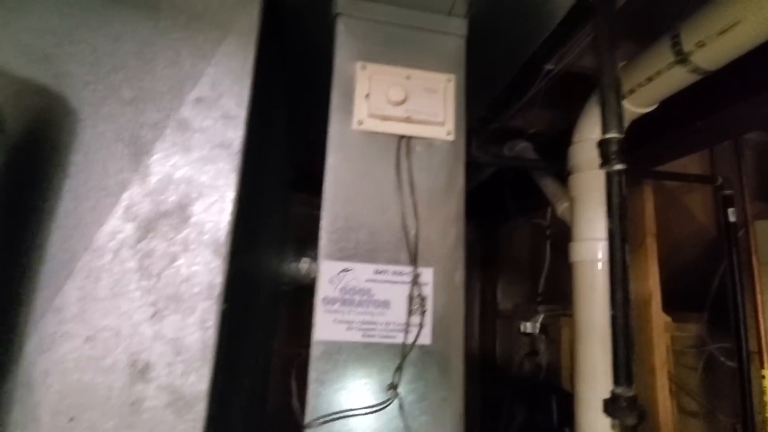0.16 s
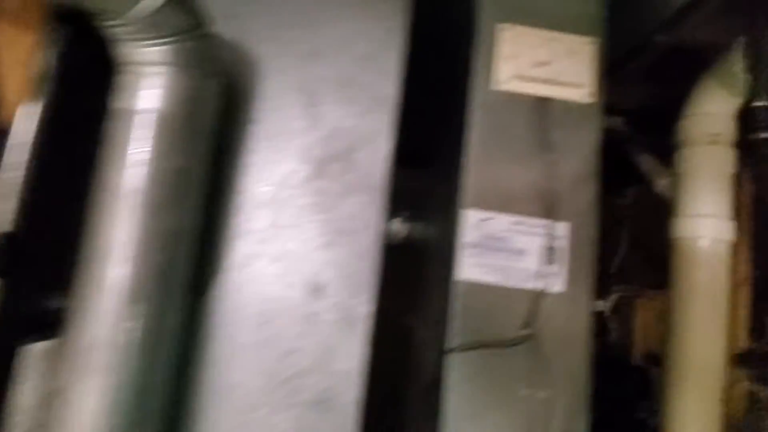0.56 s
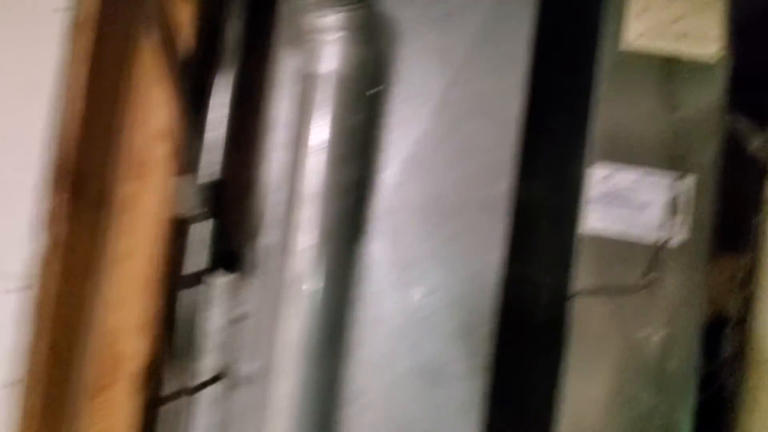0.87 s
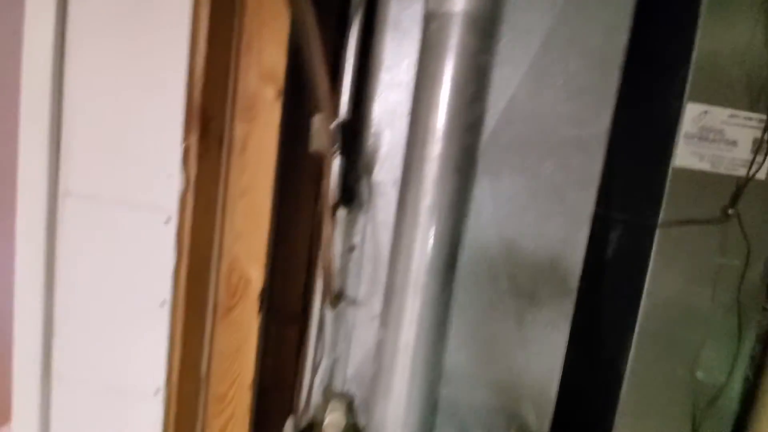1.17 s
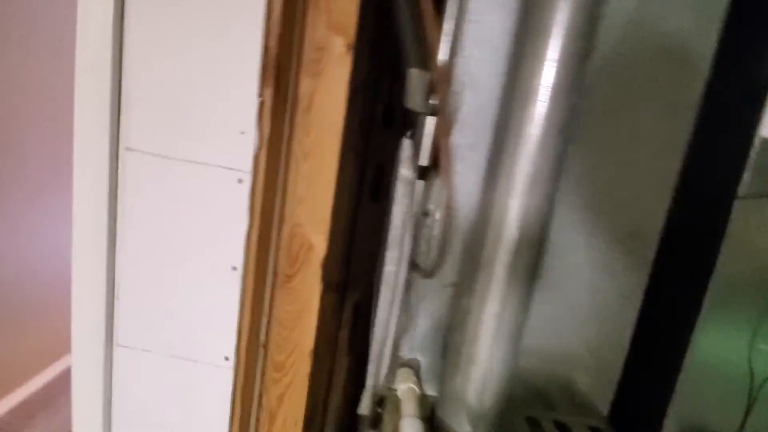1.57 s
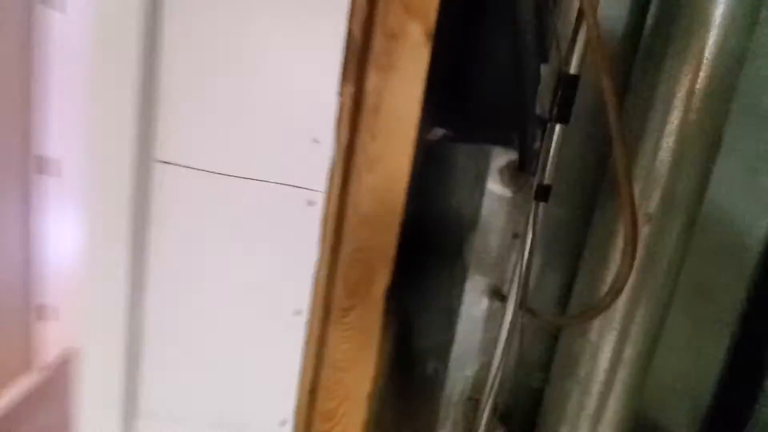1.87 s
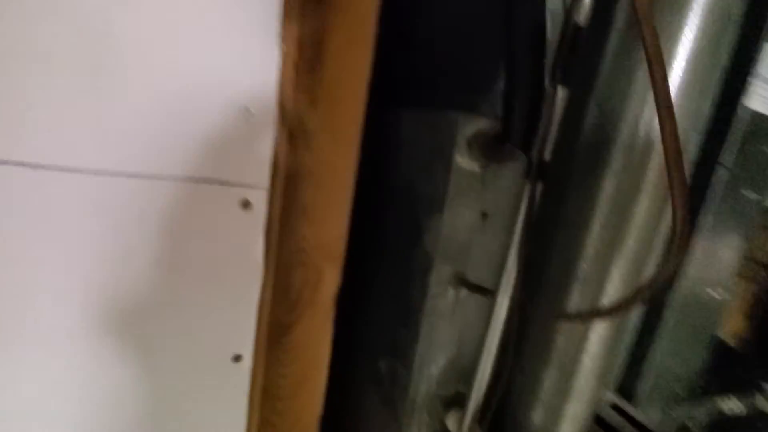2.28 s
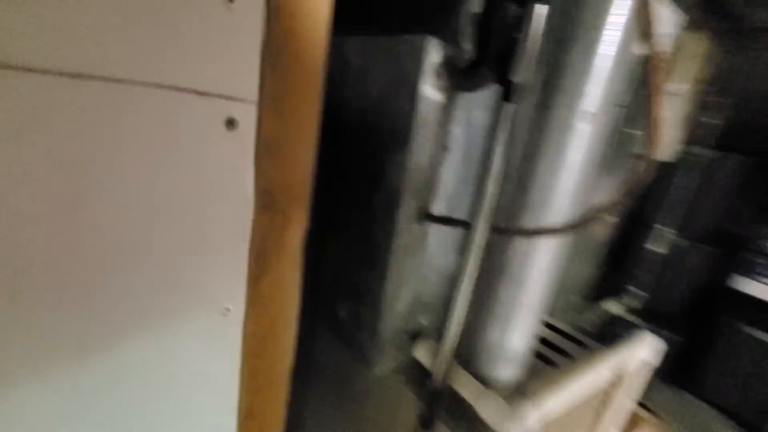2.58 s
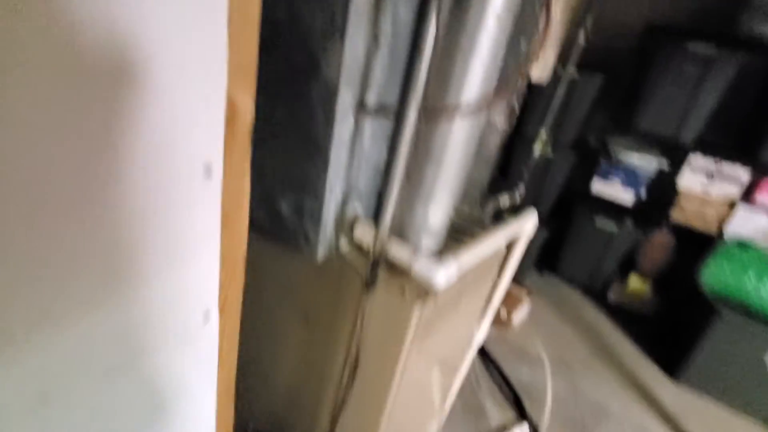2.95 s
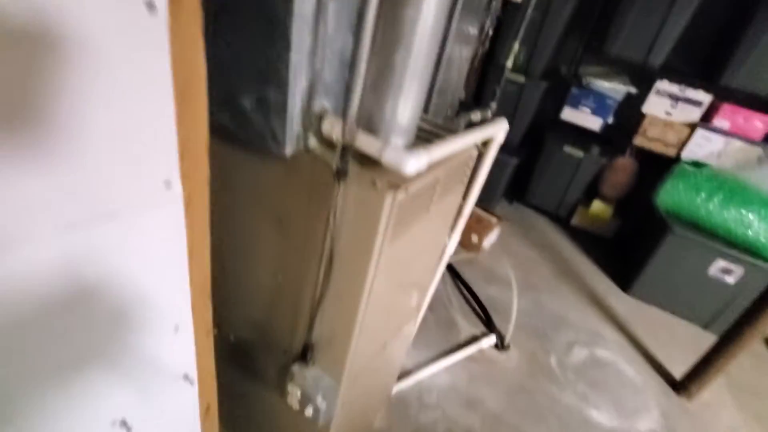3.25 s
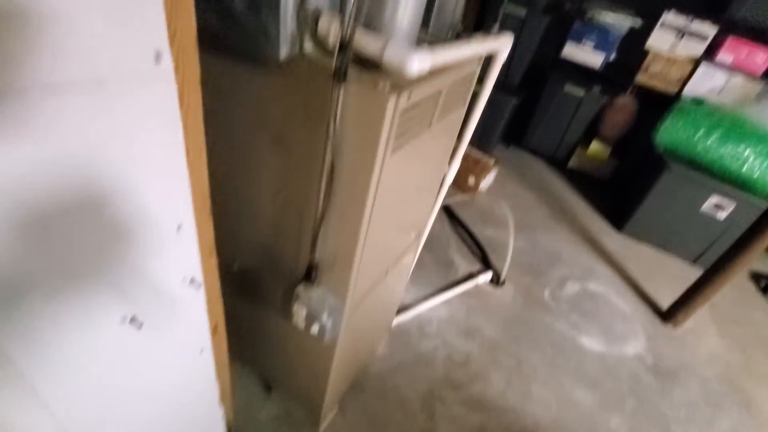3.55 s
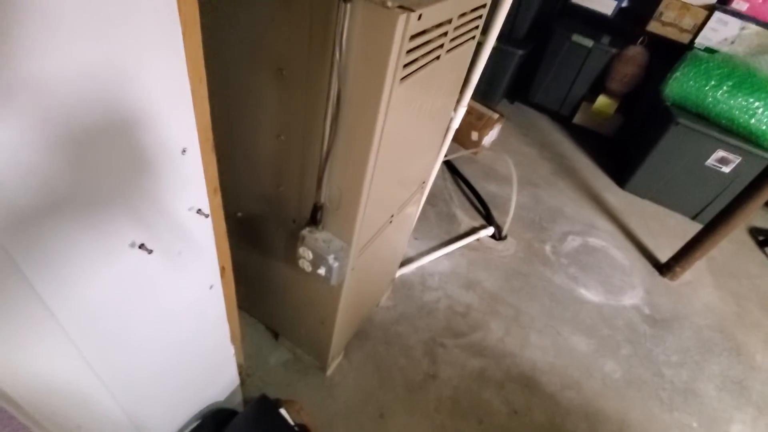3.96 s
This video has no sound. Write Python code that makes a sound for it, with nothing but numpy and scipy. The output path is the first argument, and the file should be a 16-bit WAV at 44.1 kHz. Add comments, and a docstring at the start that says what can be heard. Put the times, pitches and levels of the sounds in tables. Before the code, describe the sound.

In a basement, a running furnace gives a steady low motor hum and a broad rumble of air through sheet-metal ducts. The handheld stereo microphone moves along close by, so hollow metallic resonances shift and the sound slowly grows duller and quieter. Soft cloth brushes come early; just before two seconds there is a light tap and scuff, then a sharper click with a wooden knock around 2.7 seconds, and small clicks afterwards.

```python
"""Basement furnace with duct airflow

A motor hums at twice the mains rate, with weaker wavering tones, as steady sines with slow level changes.
Filtered noise is the rumbling, rushing air; it excites resonances of the sheet-metal ducts and cabinet.
The microphone passes the ducts and backs away: resonances come and go, the echoes shift and mostly lengthen.
Enveloped noise makes soft brushes of sleeves and soles and light clicks; decaying sines make wooden knocks.
"""
import sys
import numpy as np
from scipy.fft import rfft, irfft, next_fast_len
from scipy.io import wavfile

SR = 44100
rng = np.random.default_rng(int(sys.argv[2]) if len(sys.argv) > 2 else 0)


def generate_wav(signal):
    """Clip the signal to [-1, 1] and save it as 16-bit WAV at the path in sys.argv[1]."""
    frames = np.transpose(np.atleast_2d(signal))
    scaled = np.clip(frames, -1, 1) * 32767
    pcm = np.round(scaled).astype(np.int16)
    wavfile.write(sys.argv[1], SR, pcm)


N = 181780
TIME = np.arange(N) / SR   # s
SIZE = next_fast_len(N, True)
BINS = np.maximum(np.arange(SIZE // 2 + 1) * SR / SIZE, 1)   # Hz


def from_db(db):
    """Decibels to gain."""
    return 10 ** (np.asarray(db) / 20)


def rms_one(x):
    """Scale to unit rms."""
    return x / np.sqrt(np.mean(x ** 2) + 1e-20)


def in_time(rows):
    """One curve per value column, joined by straight lines."""
    s, *columns = np.transpose(rows)
    return [np.interp(TIME, s, column) for column in columns]


def over_bins(points):
    """Table read along the log-frequency axis."""
    hz, value = np.transpose(points)
    return np.interp(np.log(BINS), np.log(hz), value)


def wave(spectrum):
    """Spectrum back to sound."""
    return irfft(spectrum, SIZE)[..., :N]


def drift(rate_hz):
    """Low-passed noise of unit rms: slow random variation."""
    noise = rfft(rng.standard_normal(SIZE))
    return rms_one(wave(noise / (1 + (BINS / rate_hz) ** 2)))


def registers(spectrum, centres_hz):
    """Split a sound into overlapping registers that add up to the whole."""
    parts = []
    for shares in np.eye(len(centres_hz)):
        weight = over_bins(list(zip(centres_hz, shares)))
        parts.append(wave(spectrum * weight))
    return parts


def room_noise():
    """Spectrum of stereo white noise at 0 dB per Hz; long waves reach both ports alike."""
    # left-right likeness: (frequency [Hz], correlation)
    likeness = [(60, 0.96), (180, 0.98), (350, 0.92), (750, 0.7), (1200, 0.26), (2000, 0), (16000, 0)]
    alike = np.clip(over_bins(likeness), -1, 1)
    mid, side = rfft(rng.standard_normal((2, SIZE))) * np.sqrt(SR) / 2
    return np.sqrt(1 + alike) * mid + np.sqrt(1 - alike) * side * [[1], [-1]]


def standing_waves(ripple_db=2.5, spacing_hz=30, dense_above_hz=700):
    """The basement's many overlapping modes leave fine peaks and dips across the spectrum."""
    count = SR // 20
    ripple = np.interp(BINS / spacing_hz, np.arange(count), rng.standard_normal(count))
    density = BINS / (BINS + dense_above_hz)
    return from_db(ripple_db * ripple * density)


def contact_noise(colour, envelopes, tilts_db, pans_db, low_cut_hz=300, tilt_pivot_hz=4970):
    """Stereo noise under one envelope per contact, each with its own brightness and side."""
    # centres of the registers that carry the tilt: (frequency [Hz])
    centres_hz = [1100, 3200, 8000, 14000]
    low_cut = BINS / (BINS + low_cut_hz)
    parts = registers(room_noise() * from_db(over_bins(colour)) * low_cut, centres_hz)
    powers, out = np.square(envelopes), 0
    for hz, part in zip(centres_hz, parts):
        octaves = np.log2(hz / tilt_pivot_hz)
        gains = from_db(tilts_db * octaves + [pans_db, -pans_db])
        out = out + part * np.sqrt(gains ** 2 @ powers)   # contacts add in power
    return out / np.std(sum(parts))


def motor(hum_hz=119.8, hum_waver_db=3.0, phase_wander_rad=0.66):
    """The mains-locked hum holds its pitch; motor and fan tones waver in level and phase."""
    # hum before waver: (time [s], level [dB rms])
    hum_levels = [(0, -31), (.5, -31.5), (1, -28.5), (1.4, -36), (1.8, -30), (2.3, -35), (3.1, -41),
                  (3.8, -35.5), (4.12, -42)]
    # weaker tones: (frequency [Hz], level before waver [dB rms], waver [dB rms])
    tones = [(95.65, -42.5, 4.5), (254.7, -52, 9.5), (345.3, -62, 6.5), (494, -59, 7), (671, -60, 5.5),
             (710, -56.5, 1), (900, -66, 8)]
    hum_db, = in_time(hum_levels)
    hum = np.sin(2 * np.pi * (hum_hz * TIME + rng.random()))
    out = from_db(hum_db + hum_waver_db * drift(2.5)) * hum
    for hz, level_db, waver_db in tones:
        phase = 2 * np.pi * (hz * TIME + rng.random()) + phase_wander_rad * drift(0.6)
        out = out + from_db(level_db + waver_db * drift(0.72)) * np.sin(phase)
    return np.sqrt(2) * out   # sine peak from rms


def airflow(rumble_hz=148, rush_hz=1280, hiss_hz=9000):
    """Broad turbulence; rumble, rush and hiss each fade at their own rate with distance."""
    # turbulence before ripple and fade: (frequency [Hz], density [dB per Hz])
    air_colour = [(20, -81), (31, -93), (48, -55.5), (75, -52), (180, -59), (270, -60.5), (350, -69.5),
                  (620, -69.5), (820, -69), (1000, -73.5), (1600, -78.5), (2200, -80), (3200, -84),
                  (4000, -86.5), (5200, -92), (8000, -99.5), (16000, -101.3)]
    # loss as the microphone backs away: (rumble [dB/s], rush [dB/s], hiss [dB/s])
    fade_db_per_s = (0.8, 1.3, .5)
    turbulence = room_noise() * from_db(over_bins(air_colour)) * standing_waves()
    parts = registers(turbulence, (rumble_hz, rush_hz, hiss_hz))
    from_middle_s = TIME - TIME.mean()
    return sum(from_db(-loss * from_middle_s) * part for loss, part in zip(fade_db_per_s, parts))


def ducts(far_db=-19, eddy_count=4, reach_s=0.83, reach_at_hz=514):
    """Turbulence rings each resonance, which swells as the microphone passes; low ones swell more slowly."""
    # duct and cabinet modes: (frequency [Hz], width [Hz], level at loudest [dB rms], loudest at [s])
    duct_modes = [(93, 14.3, -42, 1.4), (154.8, 21, -36, 0.11), (211.5, 30, -41, 3.1),
                  (245, 28.8, -41, 2.2), (344.6, 22.2, -44, 1.86), (393, 45, -40, 1.37),
                  (422.3, 23, -47.5, 4.24), (479, 34, -50.5, 1.93), (534, 96, -44.5, .1),
                  (591, 64, -46, 3.8), (656, 48, -48.5, 1.24), (767, 59, -44.5, 1),
                  (878.4, 33, -45.5, 0.57), (1101, 98, -43, 0.11), (1187, 170, -50, 1.06),
                  (1520, 100, -58.5, 1.75), (2760, 290, -51, .14)]
    eddies = [room_noise() for _ in range(eddy_count)]   # neighbouring modes get unrelated noise
    out = 0
    for k, (hz, width_hz, level_db, loudest_s) in enumerate(duct_modes):
        detune = (BINS ** 2 - hz ** 2) / (BINS * width_hz)
        resonance = 1 / (1 + 1j * np.sqrt(2) * detune - detune ** 2)
        ringing = rms_one(wave(eddies[k % eddy_count] * resonance))
        passing_s = reach_s * reach_at_hz / hz   # grows with wavelength
        near = np.exp(-0.5 * ((TIME - loudest_s) / passing_s) ** 2)
        out = out + from_db(level_db) * np.maximum(near, from_db(far_db)) * ringing
    return out


def with_echoes(air):
    """Two dull echoes comb the noise; its peaks and dips slide as the lags change with position."""
    # echo path: (time [s], lag off duct face [ms], lag off wall [ms])
    echo_lags = [(0, 2.3, 5.35), (1.2, 3.35, 5.8), (1.6, 3.37, 8.8), (2, 1.76, 10), (2.35, 2.57, 8.3),
                 (2.65, 4.54, 9.3), (3.2, 4.9, 10.2), (4.12, 3.76, 8.7)]
    # duct face, then wall: (level before dulling [dB], low-pass corner [Hz])
    echo_tones = [(-15, 420), (-8.5, 110)]
    out = air
    for lag_ms, (level_db, dull_hz) in zip(in_time(echo_lags), echo_tones):
        dull = wave(rfft(air, SIZE) / np.hypot(1, BINS / dull_hz))
        sent_s = TIME - lag_ms / 1000
        echo = np.array([np.interp(sent_s, TIME, side) for side in dull])
        out = out + from_db(level_db) * echo
    return out


def brushes(grain_db=1.0, grain_hz=300, leftward_db=0.1):
    """Friction of cloth and soles swells and dies away, roughened by many tiny catches."""
    # strokes: (peak time [s], level before tilt [dB rms], rise [s], fall [s], tilt [dB per octave])
    strokes = [(.24, -55, .17, 0.11, 4.5), (.58, -54, 0.046, 0.027, 1), (1.06, -69, .09, .05, 9),
               (1.68, -55.5, .06, .14, 2), (1.897, -43.5, 0.028, 0.048, -4.5),
               (1.992, -45.5, 0.025, 0.025, 1), (2.545, -41.5, 0.0091, 0.022, -1.5),
               (2.685, -53.5, 0.042, 0.023, -5), (2.815, -37, 0.04, 0.026, 0),
               (3.141, -40, 0.0077, 0.024, -1)]
    # friction spectrum: (frequency [Hz], level [dB])
    brush_colour = [(300, -14), (900, -5), (3400, 2.5), (5200, -4.5), (8000, -7), (10200, -8),
                    (11400, -3.5), (13000, -6), (16000, -8)]
    s, level_db, rise_s, fall_s, tilts_db = np.transpose(strokes)
    age_s = TIME - s[:, None]
    rise = (age_s / rise_s[:, None]) ** 2
    fall = age_s / fall_s[:, None]
    fade = np.where(age_s < 0, rise, fall)
    envelopes = from_db(level_db[:, None]) * np.exp(-np.minimum(fade, 20) / 2)
    catches = rms_one(from_db(grain_db * drift(grain_hz)))
    return catches * contact_noise(brush_colour, envelopes, tilts_db, np.full(len(s), leftward_db))


def clicks(crack_t60_s=0.013, room_t60_s=0.33, room_db=-15):
    """A short crack, then a faint diffuse tail from the basement walls."""
    # clicks: (time [s], crack level before tilt and pan [dB rms], tilt [dB per octave],
    #          pan [dB up on left and down on right])
    click_events = [(.9976, -56, 3, 1), (1.051, -54, 3, 1), (1.1074, -51, 5, 4), (1.8672, -36, -7, 0),
                    (1.886, -44, -7, 6), (2.66, -27, -0.5, 3), (2.666, -37, -7, -4),
                    (2.6795, -36.5, -5, -6), (2.8144, -29.5, -8, -0.5), (3.133, -36, 3.5, 0),
                    (3.3154, -45, 1, 0), (3.601, -44, 4.5, -1)]
    # click spectrum: (frequency [Hz], level [dB])
    click_colour = [(300, -16), (800, -6), (1200, -2), (1600, -1), (2600, 2), (3100, 11), (3550, -8),
                    (4100, 9), (5000, -1.5), (8800, -2), (10000, 1.5), (12500, -6), (16000, 2)]
    s, level_db, tilts_db, pans_db = np.transpose(click_events)
    age_s = TIME - s[:, None]
    decay = np.log(1000) * np.clip(age_s, 0, 1)
    crack = np.exp(-np.minimum(decay / crack_t60_s, 20))
    tail = from_db(room_db) * np.exp(-decay / room_t60_s)
    envelopes = from_db(level_db[:, None]) * (age_s >= 0) * (crack + tail)
    return contact_noise(click_colour, envelopes, tilts_db, pans_db)


def knocks(soft_s=0.0015):
    """A light bump sets a board ringing briefly; each port hears the modes in a different phase."""
    # bumps on wood: (time [s], reference level of the modes [dB])
    bumps = [(1.888, -43), (2.661, -42), (2.678, -33)]
    # board modes: (frequency [Hz], level re bump [dB], T60 [s])
    board_modes = [(988, 0.5, 0.13), (1137, -2, 0.11), (1260, -0.5, 0.09), (1490, -5, 0.071),
                   (3280, -8, 0.048), (4050, -12, 0.044)]
    out = 0
    for s, level_db in bumps:
        age_s = np.clip(TIME - s, 0, 0.5)
        onset = 1 - np.exp(-age_s / soft_s)
        for hz, mode_db, t60_s in board_modes:
            envelope = onset * np.exp(-np.log(1000) * age_s / t60_s)
            ringing = np.sin(2 * np.pi * (hz * age_s + rng.random((2, 1))))
            out = out + from_db(level_db + mode_db) * envelope * ringing
    return out


def scene():
    """The running furnace and the small sounds of someone moving beside it."""
    furnace = motor() + with_echoes(airflow() + ducts())
    return furnace + brushes() + clicks() + knocks()


def record(dry, cutoff_hz=15880, slope_hz=200):
    """Each microphone port colours the sound in its own way; the top is cut steeply."""
    # port responses: (frequency [Hz], gain [dB])
    left_port = [(300, 1), (700, 1), (1300, 2.5), (3000, -2), (4200, -1), (6000, 0), (8500, -1.5),
                 (10200, -1), (13000, 1.5), (14300, 9), (16000, 6)]
    right_port = [(300, 1), (700, -1), (1300, -1), (4200, -3), (7400, 0), (8700, 3.5), (10200, -6),
                  (12000, 2), (14000, -6), (16000, 3)]
    margin = (SIZE - N) // 2   # mirrored ends let the filters run in and out
    padded = np.pad(dry, [(0, 0), (margin, margin)], "reflect")
    ports = from_db([over_bins(left_port), over_bins(right_port)])
    low_pass = np.clip((cutoff_hz - BINS) / slope_hz + 0.5, 0, 1)
    return irfft(rfft(padded, SIZE) * ports * low_pass, SIZE)[:, margin:margin + N]


dry = scene()
out = record(dry)
generate_wav(out)
```